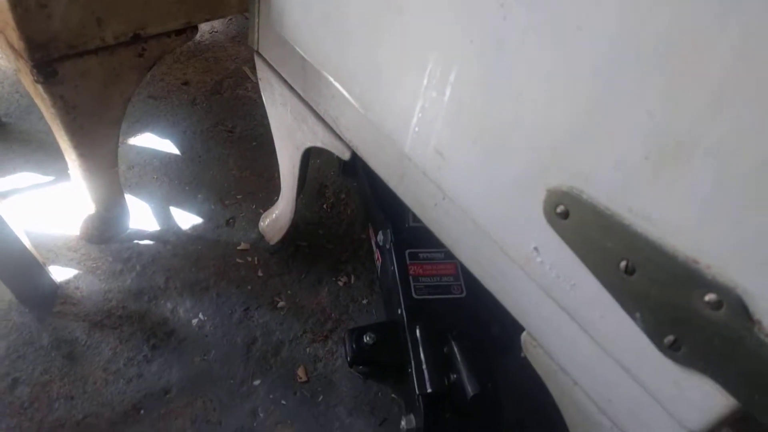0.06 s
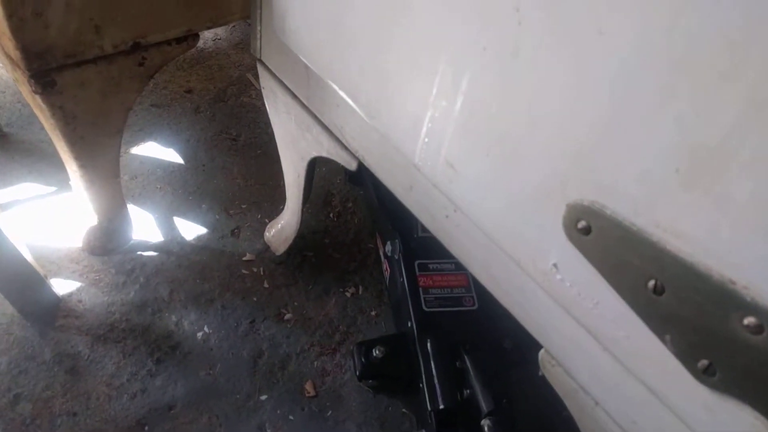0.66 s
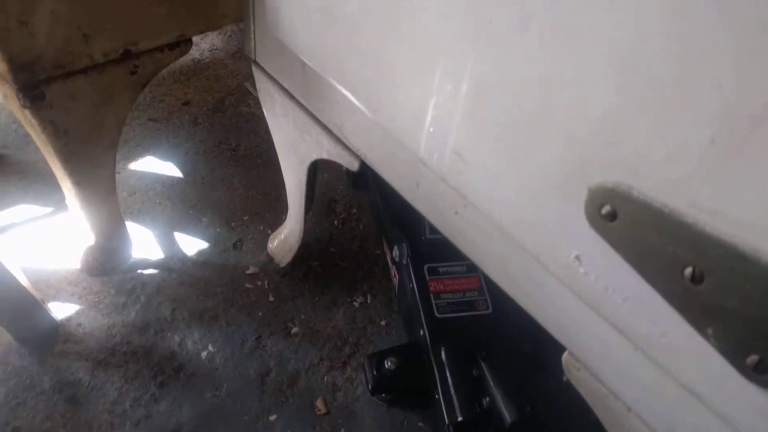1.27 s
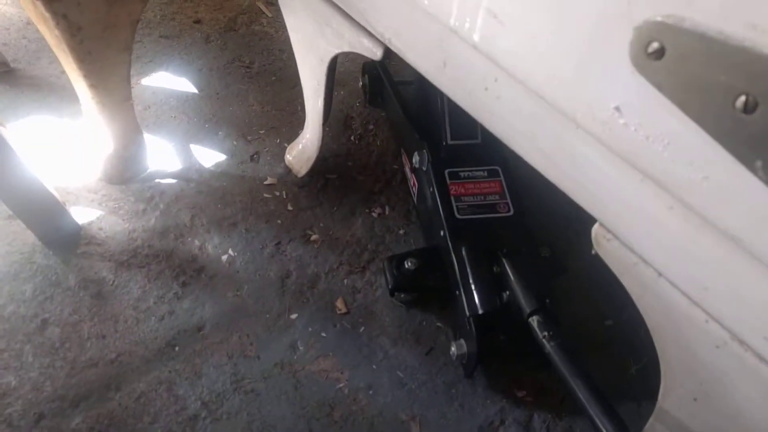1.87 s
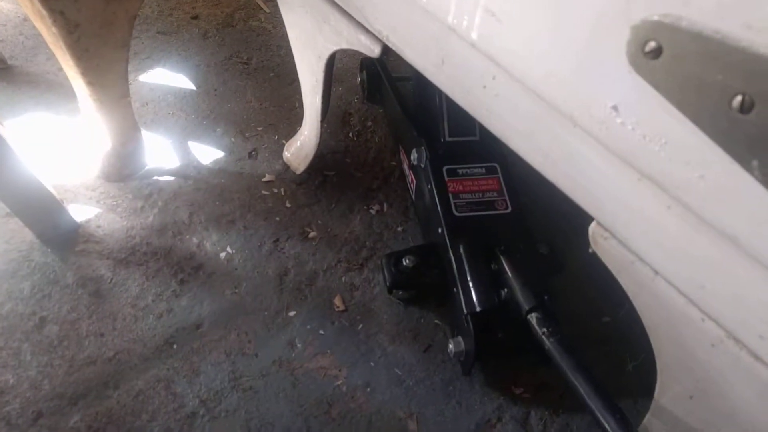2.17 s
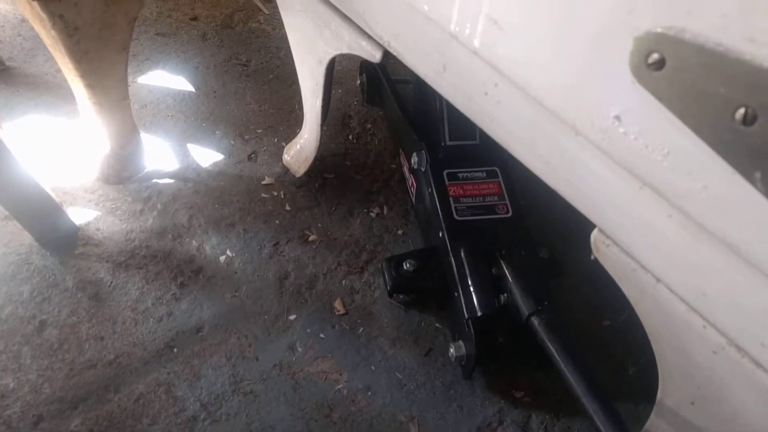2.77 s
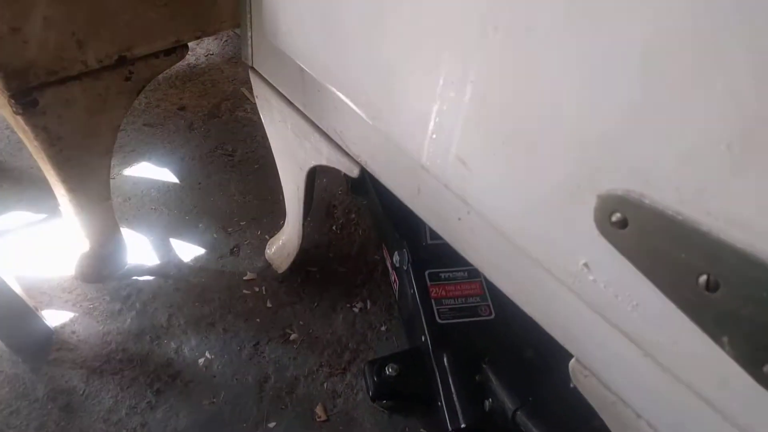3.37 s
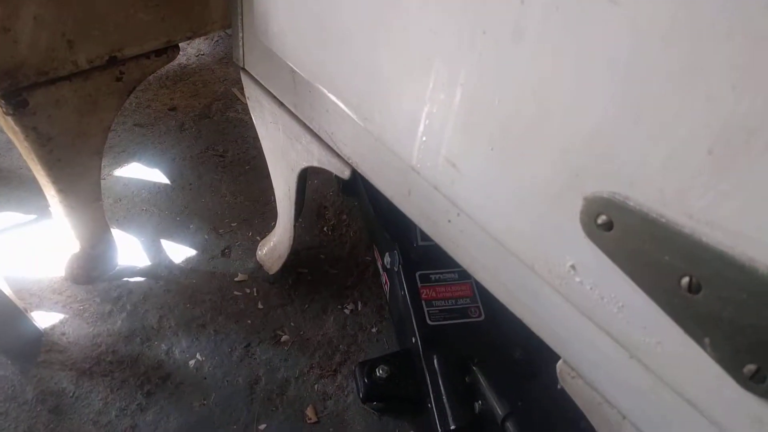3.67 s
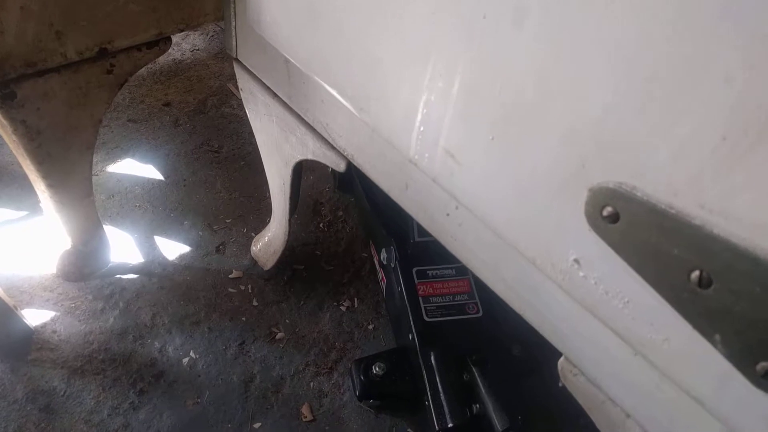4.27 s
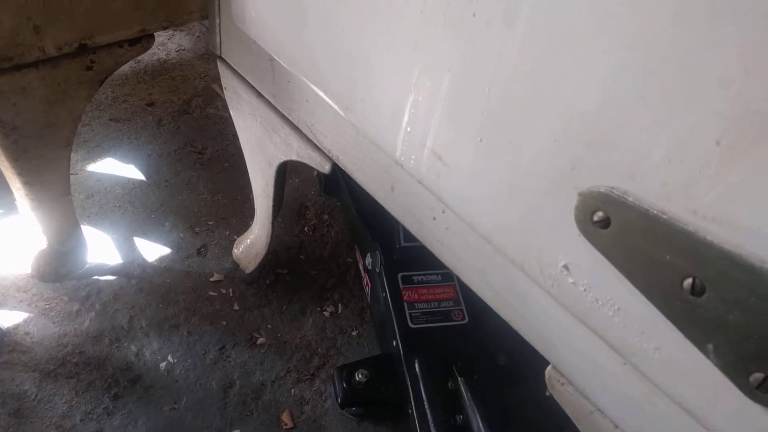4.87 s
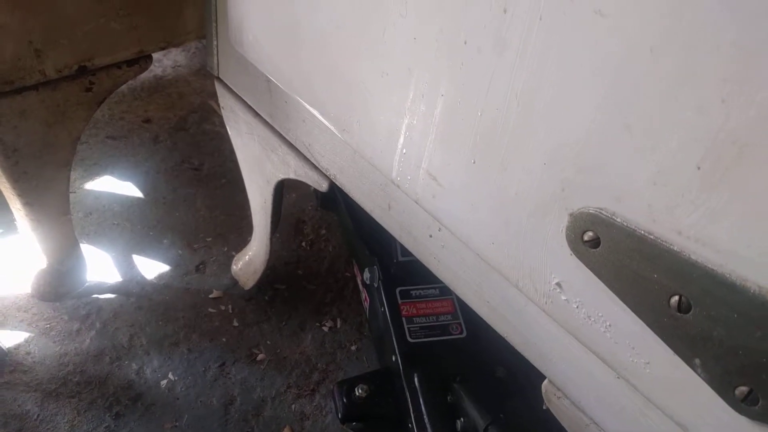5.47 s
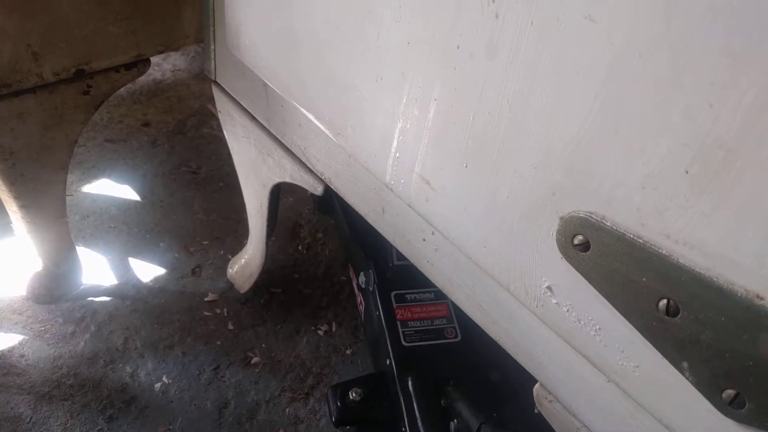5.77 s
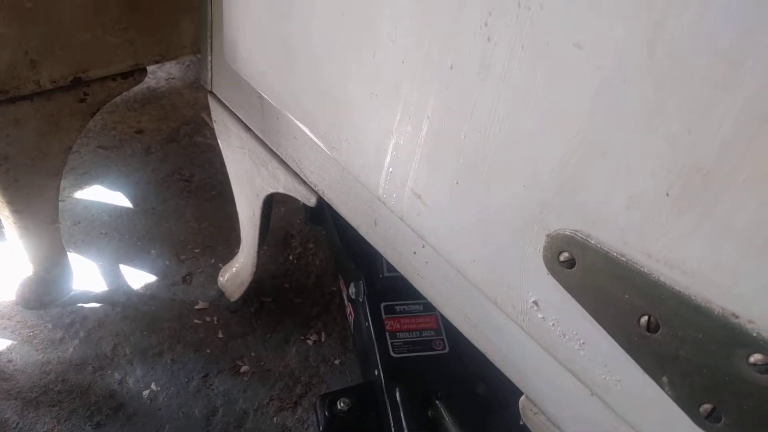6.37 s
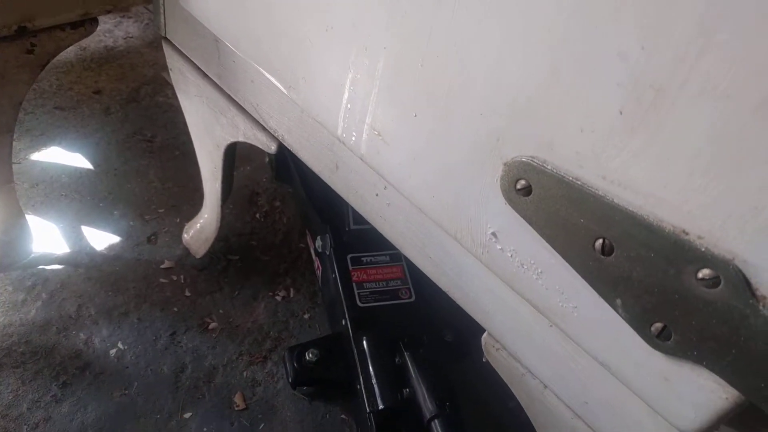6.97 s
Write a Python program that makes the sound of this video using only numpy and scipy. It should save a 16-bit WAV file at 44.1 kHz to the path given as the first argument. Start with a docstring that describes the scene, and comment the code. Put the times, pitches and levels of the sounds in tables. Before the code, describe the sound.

A steel jack is worked under an old refrigerator on a concrete floor. A few small clicks lead to a solid knock and a dull boom from the cabinet's panels, then a quick cluster of bright clanks from the handle. Sparser ticks and knocks follow while a low compressor hum slowly grows. A faint hissy motor whine comes and goes over the room's soft rumble, all heard from nearby.

```python
"""On a concrete floor, a steel jack is worked under an old refrigerator. Impacts of the handle and linkage
excite the damped modes of the steel; the cabinet scrapes on the saddle, its sheet-metal panels boom
as the load shifts, and grit ticks underneath. A motor's hissy whine comes and goes in surges, and
a low compressor hum grows as it creeps up in pitch, over the rumble and hiss of the room."""
import sys
import numpy as np
from scipy import signal
from scipy.fft import rfft, irfft, next_fast_len
from scipy.io import wavfile
from scipy.ndimage import map_coordinates

SR = 44100
rng = np.random.default_rng(int(sys.argv[2]) if len(sys.argv) > 2 else 0)


def wav_out(sig):
    """Save sig, one row per channel (or a flat mono array), as 16-bit PCM at SR to the path in sys.argv[1]."""
    wavfile.write(sys.argv[1], SR, np.round(np.clip(np.atleast_2d(sig).T, -1, 1) * 32767).astype(np.int16))


N = 314874

# steel contacts: start_s, rise_s, t60_s, level_db, hardness_db_per_octave, favoured_hz, favoured_db
BLOWS = [(.789, 0.011, 0.1, -41.5, -2, 8130, -47), (.993, 0.0021, 0.064, -33.5, -2.3, 4515, -56),
         (1.1835, 0.0023, 0.074, -19, -2.5, 410, -35.5), (1.201, .0013, 0.41, -39, -2, 1690, -25.5),
         (1.272, 0.002, 0.12, -33, 0, 4515, -36.5), (1.330, .003, 0.12, -28, 2.5, 3640, -37.5),
         (1.348, .012, .11, -29.5, -0.5, 680, -31), (1.941, 0.0014, 0.06, -36, 0.8, 6570, -43),
         (2.385, 0.0011, 0.13, -46.5, 0.5, 2340, -38), (2.395, .011, 0.092, -40.5, 1.5, 7950, -38),
         (2.518, 0.01, 0.07, -43, -5, 410, -52.5), (2.609, 0.00091, 0.061, -47.5, 2.5, 8100, -61),
         (2.708, .002, .3, -37.5, 1.5, 2342, -41), (2.726, 0.00052, 0.26, -30.5, 2, 2150, -31),
         (2.75, 0.0026, 0.071, -22, .3, 6010, -36.5), (2.761, 0.0064, 0.042, -25.5, 4, 3600, -54),
         (2.852, .003, 0.06, -20.5, 4, 2342, -35), (2.892, 0.014, 0.034, -22, 1.95, 7900, -28.5),
         (3.459, 0.011, 0.033, -43, -0.3, 7260, -44), (3.764, 0.0035, 0.06, -42, -7.5, 610, -43),
         (4.601, 0.0011, 0.062, -48, -5, 1760, -59), (4.642, 0.0093, 0.1, -47, -7.5, 1610, -46),
         (4.903, 0.0015, 0.05, -38.5, 0, 807, -55), (4.954, 0.003, 0.051, -52, 5, 4515, -58),
         (5.333, 0.0017, 0.045, -42, -4.5, 8040, -50), (5.891, 0.0031, 0.047, -39, 0.3, 2110, -43.5),
         (6.036, 0.0015, .045, -44.5, 4, 5457, -43), (6.081, 0.0019, 0.079, -28, -2.5, 410, -47),
         (6.203, 0.0033, 0.066, -47.5, -8, 1545, -59)]
# modes of jack and cabinet ringing together: pitch_hz, level_db, t60_s
STEEL_MODES = [(410, 0, .13), (549, -1, .45), (754, 0, .28), (807, -6, .25), (1233, -1, .22),
               (1405, -4, .2), (1545, -6, .3), (1647, 0, .13), (1733, -1, .17), (1868, -3, .14),
               (2150, -1, .1), (2342, -1, .16), (2466, -4, .16), (2850, -3, .25), (3560, -5, .35),
               (3640, -3, .3), (3800, 0, .14), (4515, -1, .24), (5457, -3, .14), (6010, 0, .26),
               (6140, -3, .24), (6570, -3, .2), (7303, -2, .2), (7790, -1, .21), (7900, -2, .22),
               (8130, -4, .18), (8465, -1, .26), (9500, 0, .28), (11330, 0, .2), (12730, 2, .2),
               (13900, 2, .2)]
# spectrum of a contact of middling hardness: frequency_hz, density_db
CONTACT_SPECTRUM = [(60, 0), (300, 2.5), (800, -1), (1600, -1.5), (2800, -2), (5600, -0.5), (7800, 0.5),
                    (10200, -15.5), (14000, -17.5), (15800, -22)]
# hard contacts brighten evenly: frequency_hz, tilt_octaves
HARD_TILT = [(450, -2.5), (2100, 0), (6500, 1.73), (12000, 3)]
# soft contacts lose their top past a knee: frequency_hz, tilt_octaves
SOFT_TILT = [(450, -1.2), (1500, -0.7), (3900, 0.33), (5400, 1), (12000, 4)]
def jack():
    """Impact excitation: a rattle of tiny impacts sets the steel ringing; harder contacts are brighter."""
    out, t = np.zeros(N), np.arange(SR // 2) / SR
    mode_hz = np.transpose(STEEL_MODES)[0]
    grid_hz = np.linspace(0, SR / 2, num=2000)
    frame = frame_response(grid_hz, floor_db=-2.5)
    treble = 1 / (1 + (9100 / (grid_hz + 1)) ** 10)
    knots_s = t[::40]
    for start_s, rise_s, t60_s, level_db, hardness, favoured_hz, favoured_db in BLOWS:
        tilt_db = hardness * along(HARD_TILT if hardness > 0 else SOFT_TILT, grid_hz)
        grind_db = 2.5 * np.log2(rise_s / 0.0028) * treble  # a contact that grinds on gains treble
        colour_db = level_db + along(CONTACT_SPECTRUM, grid_hz) + tilt_db + grind_db
        colour = amp(colour_db) * frame
        onset = np.minimum(t / rise_s, 1)
        chatter = unit(amp(2.3 * np.interp(t, knots_s, rng.standard_normal(len(knots_s)))))
        rattle = filtered(rng.standard_normal(len(t)), lambda hz: np.interp(hz, grid_hz, colour))
        contact = rattle * chatter * onset * fade(t - rise_s, t60_s)
        # every mode takes its share of the contact; the spot struck favours one pitch
        share = amp(np.interp(mode_hz, grid_hz, colour_db) - 24.5)
        reach_hz = 64 + 0.019 * favoured_hz
        favoured = amp(favoured_db) / (1 + ((mode_hz - favoured_hz) / reach_hz) ** 2)
        steel = onset * ((share + favoured) @ ring(STEEL_MODES, t))
        add(out, start_s, contact + steel + amp(-6.5) * reverberation(contact, build_s=0.0039))
    return out


# short-lived resonances of the jack's frame: centre_hz, width_hz, level_db
FRAME_RESONANCES = [(697, 720, -0.5), (1320, 270, -2), (1880, 1330, 1.5), (2356, 290, 4.5),
                    (3560, 1400, 0.5), (4580, 170, 4.5), (5700, 250, 0), (6180, 450, 5.5),
                    (6800, 290, -0.5), (6970, 83, 3.5), (8470, 200, 3.5), (9170, 130, -9), (9460, 420, 3),
                    (11200, 350, 0), (12630, 360, 8.5), (14000, 400, -3)]
def frame_response(hz, floor_db):
    """Resonance: the frame passes vibration best near its natural frequencies."""
    power = sum(amp(level_db) ** 2 / (1 + (2 * (hz - centre_hz) / width_hz) ** 2) ** 2
                for centre_hz, width_hz, level_db in FRAME_RESONANCES)
    return np.sqrt(amp(floor_db) ** 2 + power)


# shifts of the cabinet: start_s, level_db
ROCKS = [(0.802, -39), (1.193, -26.5), (2.533, -37.5), (2.77, -30.5), (2.906, -28), (3.46, -34),
         (3.771, -45), (4.907, -40), (6.086, -33)]
# modes of its sheet-metal panels: pitch_hz, level_db, t60_s
PANEL_MODES = [(51.6, -16, 0.66), (88.9, 0.5, 0.5), (103.8, -1, 0.18), (138.4, -14.5, 0.47),
               (154.3, -13.5, 0.25), (262.3, -7.5, 0.13)]
def cabinet():
    """Plate vibration: the panels boom when the load shifts, at a slightly different pitch each time."""
    out, t = np.zeros(N), np.arange(SR * 3 // 4) / SR
    onset = 1 - np.exp(-t / 0.024)
    for start_s, level_db in ROCKS:
        detune = 1 + 0.024 * rng.standard_normal()
        add(out, start_s, amp(level_db) * onset * ring(PANEL_MODES, detune * t).sum(0))
    return out


# clinks of the handle's linkage: start_s, peak_db, tilt_db_per_octave
CLINKS = [(2.385, -33.5, -8.5), (2.402, -38.5, -10), (2.447, -43.5, -9), (2.726, -21.5, -2),
          (2.846, -17, 1), (3.449, -43.5, -5), (3.46, -31.5, 18), (4.904, -36.5, 9), (5.891, -35, -2),
          (6.083, -27, -4), (5.333, -45.5, 1), (6.944, -40.5, 4.5)]
# modes of a link: pitch_hz, level_db, t60_s
LINK_MODES = [(1243, -10.5, 0.14), (2086, 3, 0.016), (2420, 3, 0.058), (3655, 3.5, 0.028),
              (3780, 10.5, 0.042), (5470, 4, 0.05), (6430, -9, 0.039), (7330, 0.5, 0.043),
              (7930, -18, 0.027)]
def linkage():
    """Free vibration: a loose link strikes, bounces once and rings briefly."""
    out, t = np.zeros(N), np.arange(SR // 3) / SR
    lowest_hz = LINK_MODES[0][0]
    for start_s, peak_db, tilt in CLINKS:
        modes = [(hz, db + tilt * np.log2(hz / lowest_hz), t60_s) for hz, db, t60_s in LINK_MODES]
        clink = ring(modes, t).sum(0)
        bounce = amp(-2) * ring(modes, t).sum(0)
        add(clink, 0.004, bounce)
        clink = amp(peak_db) * clink / np.abs(clink).max()
        add(out, start_s, clink + amp(-15) * reverberation(clink, build_s=0.0047))
    return out


# scrapes as the saddle takes up the load: start_s, length_s, level_db
SCRAPES = [(0.937, 0.091, -48), (1.925, 0.035, -50), (5.978, 0.017, -51), (5.997, 0.034, -51),
           (6.067, 0.029, -51)]
# spectrum of sliding steel: frequency_hz, density_db
SCRAPE_SPECTRUM = [(100, -11), (600, 3.5), (1800, -7.5), (3500, -13.5), (6000, 3), (8000, -6.5),
                   (10500, -17), (15800, -25)]
def saddle():
    """Sliding friction: faint, uneven noise, coloured by the frame, swells and dies away."""
    out, t = np.zeros(N), np.arange(SR // 2) / SR
    for start_s, length_s, level_db in SCRAPES:
        stroke = np.sin(np.pi * np.minimum(t / length_s, 1))
        roughness = amp(2.6 * wobble(107)[:len(t)])
        friction = filtered(noise(SCRAPE_SPECTRUM, len(t)), lambda hz: frame_response(hz, floor_db=0.5))
        scrape = amp(level_db) * stroke * roughness * unit(friction)
        add(out, start_s, scrape + amp(-4.5) * reverberation(scrape, build_s=0.011))
    return out


# cracking grains: start_s, peak_db, centre_hz, t60_s
GRIT_TICKS = [(1.611, -43, 6070, 0.0068), (1.675, -40.5, 4530, 0.0067), (1.7003, -37, 3680, 0.0037),
              (1.765, -43, 6060, 0.0061), (5.018, -43, 5600, .014), (5.666, -25, 6440, 0.016)]
def grit():
    """Brittle fracture: grains crack under the load in short, bright, nearly dry bursts of noise."""
    out, t = np.zeros(N), np.arange(SR // 4) / SR
    for start_s, peak_db, hz, t60_s in GRIT_TICKS:
        spectrum = [(hz / 12, -30), (hz / 4, -15), (hz * 0.6, -12),
                    (hz, 0), (hz * 1.25, -5), (hz * 1.6, -22)]
        tick = noise(spectrum, len(t)) * fade(t, t60_s)
        tick = amp(peak_db) * tick / np.abs(tick).max()
        add(out, start_s, tick + amp(-12) * reverberation(tick, build_s=0.0013))
    return out


# spans in which a surge holds at its height: start_s, end_s, whine_db, hiss_db
SURGES = [(0, 0.61, -62, -60.5), (0.842, 1.25, -62.5, -57), (2.806, 3.17, -63, -66),
          (3.596, 4.66, -63, -62), (4.104, 4.2, -64, -58.5), (6.174, 6.353, -62, -60.5)]
# partials of the whine: pitch_hz, level_db
WHINE_PARTIALS = [(848, -5.5), (935, -0.5), (1053, 0), (1143, -3), (1169, 5), (1200, -8), (1405, -7),
                  (1490, -14), (1560, -7.5), (3245, -3.5), (3815, -6.5), (4220, -6)]
# spectrum of the air hiss: frequency_hz, density_db
AIR_SPECTRUM = [(300, -57), (800, -12), (1150, 4.5), (1800, -13.5), (2800, -27), (3250, -0.5), (3700, 4.5),
                (4100, -5), (4600, 1), (5200, -2.5), (6600, 8), (7400, 4.5), (8300, -11), (15000, -25)]
def motor():
    """Tonal and broadband noise: unsteady partials and a hiss of air swell, hold and sink together."""
    t = np.arange(N) / SR
    swell_s, sink_s, whine_idle_db, hiss_idle_db = 0.4, 0.28, -74.5, -70
    start_s, end_s, whine_db, hiss_db = np.transpose(SURGES)[:, :, None]
    swell = np.clip(np.minimum(1 + (t - start_s) / swell_s, 1 - (t - end_s) / sink_s), 0, 1)
    gain = lambda idle_db, top_db: amp(idle_db + np.max(swell * (top_db - idle_db), axis=0))
    clock_s = np.cumsum(1 + 0.00117 * wobble(8.3)) / SR  # all partials waver in pitch together
    whine = sum(amp(db + 1.5 * wobble(12)) * np.sin(2 * np.pi * hz * clock_s + 0.5 * wobble(25))
                for hz, db in WHINE_PARTIALS)
    air = unit(noise(AIR_SPECTRUM, N)) * amp(1.5 * wobble(13))
    return gain(whine_idle_db, whine_db) * unit(whine) + gain(hiss_idle_db, hiss_db) * air


def compressor():
    """Forced vibration: a throbbing hum with a weak octave rises in pitch and level with speed."""
    pickup_start_s, time_constant_s = 3.05, 1.05
    pickup = 1 - np.exp(-np.maximum(np.arange(N) / SR - pickup_start_s, 0) / time_constant_s)
    pitch_hz = np.interp(pickup, [0, 1], [57.1, 68.5])
    level_db = np.interp(pickup, [0, 1], [-66, -53])
    rotation = np.exp(2j * np.pi * np.cumsum(pitch_hz) / SR)
    throb = 1 + wobble(19) + 1j * wobble(17)  # random swing of strength and phase
    return amp(level_db) * unit(np.real(throb * rotation + amp(-30) * rotation ** 2))


# spectrum of the room's rumble: frequency_hz, density_db
RUMBLE_SPECTRUM = [(20, -7), (36, -16), (46, -2.5), (57, 1.5), (75, -7), (90, -3), (110, -6), (150, -17),
                   (280, -20), (500, -43)]
# spectrum of the room's hiss: frequency_hz, density_db
HISS_SPECTRUM = [(120, -4.5), (200, -5.5), (305, -6), (447, -7.5), (817, -9.5), (981, -14), (1140, -11),
                 (1640, -14.5), (1930, -17), (2990, -16.5), (3340, -21.5), (6690, -8.5), (8800, -18.5),
                 (15800, -51)]
def room():
    """Ambient noise: a steady rumble lies under a gently wavering hiss."""
    rumble = amp(-55.5) * unit(noise(RUMBLE_SPECTRUM, N))
    hiss = amp(-62.5 + 1.84 * wobble(5.4)) * unit(noise(HISS_SPECTRUM, N))
    return rumble + hiss


# reverberation times of cabinet and room: frequency_hz, t60_s
DECAY_TIMES = [(100, 0.76), (600, 0.48), (2000, 0.42), (6000, 0.29), (9000, 0.32), (15000, 0.24)]
def reverberation(x, build_s):
    """Diffuse field: reflections build up within milliseconds and linger longest in the bass."""
    hz, t, bands = signal.stft(rng.standard_normal(SR // 2), SR, nperseg=256)
    decay = fade(t, along(DECAY_TIMES, hz)[:, None])
    onset = 1 - np.exp(-t / build_s)
    tail = signal.istft(bands * decay * onset, SR, nperseg=256)[1]
    return signal.fftconvolve(x, tail / np.linalg.norm(tail))[:len(x)]


def ring(modes, t):
    """Damped normal modes, one a row, with new strengths and phases for every blow."""
    hz, db, t60_s = np.transpose(modes)[:, :, None]
    strength = amp(db + rng.standard_normal(hz.shape))
    return strength * fade(t, t60_s) * np.sin(2 * np.pi * (hz * t + rng.random(hz.shape)))


def fade(t, t60_s):
    """Exponential decay by 60 dB in t60_s."""
    return np.exp(-np.log(1000) * np.maximum(t, 0) / t60_s)


def noise(spectrum, size):
    """Spectral shaping of white noise by (frequency_hz, density_db) points."""
    return filtered(rng.standard_normal(size), lambda hz: amp(along(spectrum, hz)))


def filtered(x, gain):
    """Linear filtering: each frequency is scaled by gain(hz)."""
    size = next_fast_len(len(x) + 8192)
    return irfft(rfft(x, size) * gain(np.fft.rfftfreq(size, 1 / SR)), size)[:len(x)]


def wobble(rate_hz):
    """Random modulation: a smooth curve through rate_hz knots a second."""
    knots = rng.standard_normal(int(N * rate_hz / SR) + 4)
    return map_coordinates(knots, [np.arange(N) * rate_hz / SR])


def along(points, hz):
    """Interpolation of (frequency_hz, value) points on a logarithmic frequency axis."""
    point_hz, values = np.transpose(points)
    return np.interp(np.log(hz + 1), np.log(point_hz + 1), values)


def amp(db):
    """Amplitude ratio of a level in decibels."""
    return 10 ** (np.asarray(db) / 20)


def unit(x):
    """Normalisation to rms 1."""
    return x / np.sqrt(np.mean(x ** 2) + 1e-20)


def add(track, start_s, sound):
    """Superposition of a sound on the track from start_s."""
    part = track[round(start_s * SR):][:len(sound)]
    part += sound[:len(part)]


def scene():
    """Superposition: the pressures of all sources add at one microphone."""
    return (jack() + saddle() + linkage() + cabinet() + grit() + motor() + compressor() + room())[None]


def record(dry):
    """Band limiting: the microphone weakens the deepest bass and keeps nothing above its top frequency."""
    low_hz, top_hz = 42, 15900
    low_cut = lambda hz: 1 / np.sqrt(1 + (low_hz / (hz + 1)) ** 8) + amp(-35.5)
    return np.array([filtered(channel, lambda hz: low_cut(hz) * (hz < top_hz)) for channel in dry])


dry = scene()
out = record(dry)
wav_out(out)
```